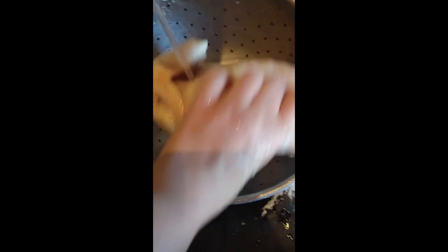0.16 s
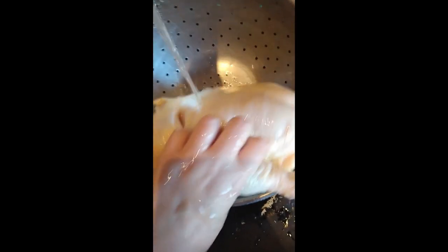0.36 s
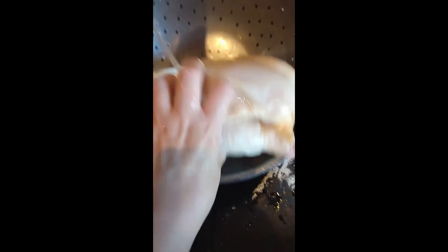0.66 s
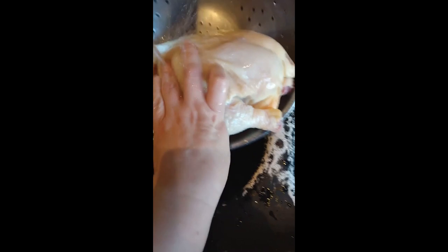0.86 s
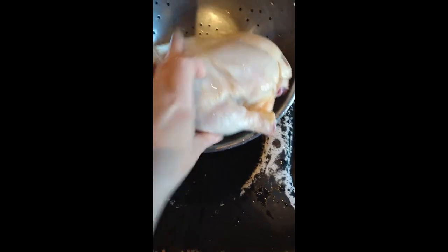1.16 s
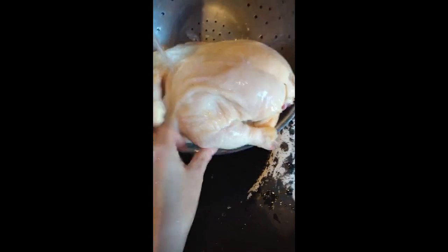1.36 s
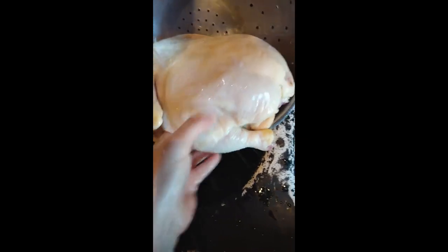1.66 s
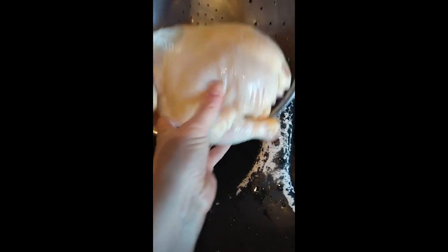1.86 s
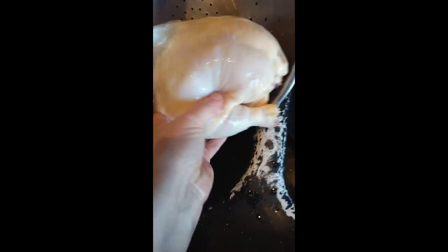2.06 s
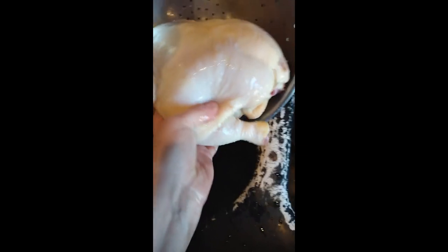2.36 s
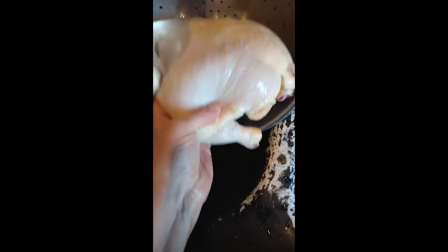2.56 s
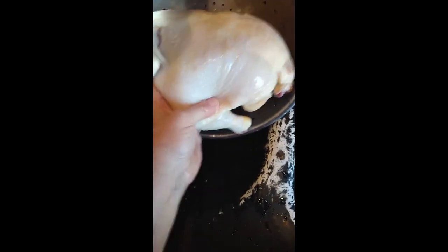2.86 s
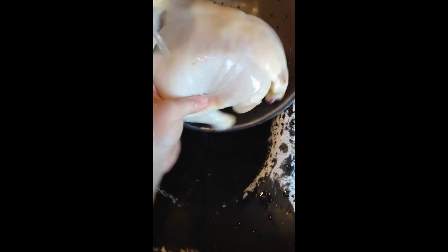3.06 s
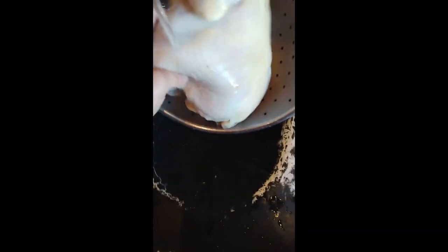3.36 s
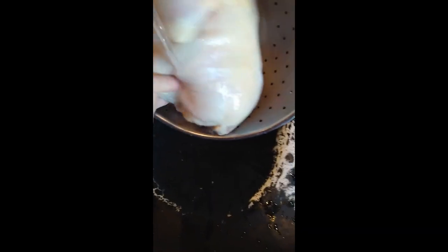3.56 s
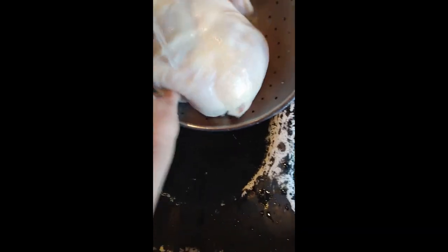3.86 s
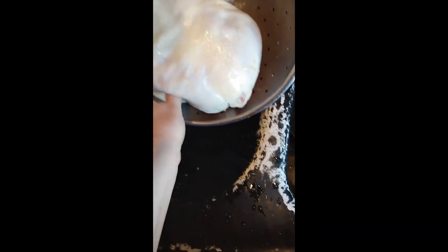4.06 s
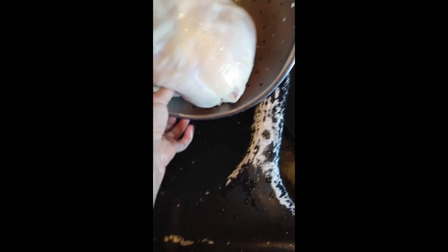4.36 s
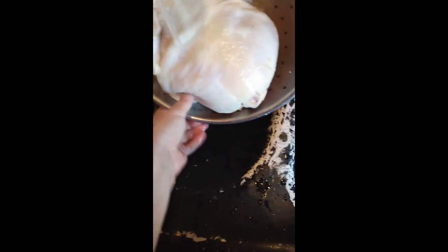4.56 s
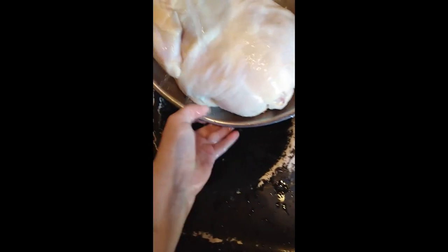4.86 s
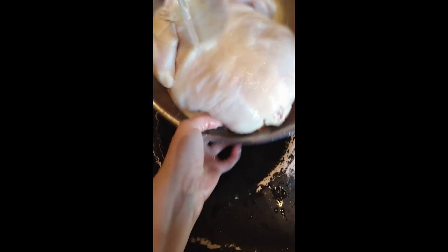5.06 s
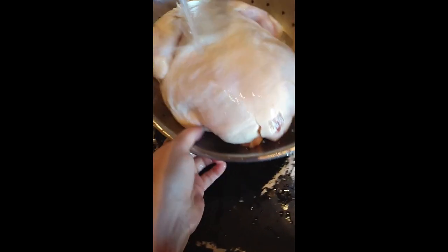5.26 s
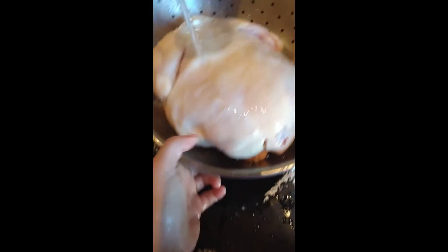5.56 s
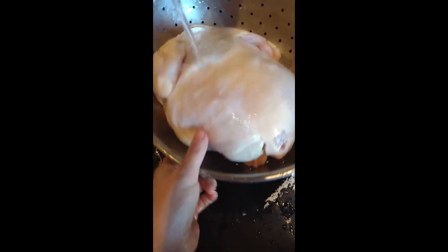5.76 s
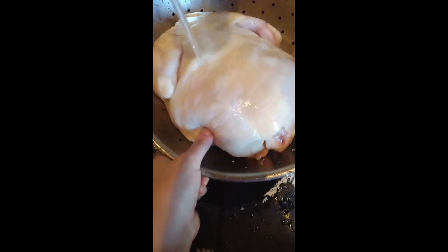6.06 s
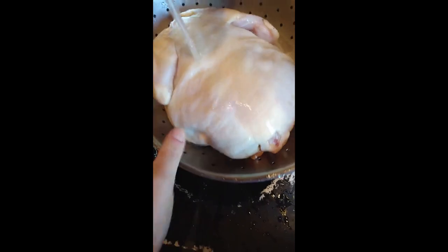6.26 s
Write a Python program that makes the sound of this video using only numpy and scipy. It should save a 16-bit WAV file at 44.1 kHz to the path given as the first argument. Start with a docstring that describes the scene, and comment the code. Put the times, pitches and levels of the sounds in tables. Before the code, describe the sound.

Close, left-leaning stereo sound of tap water over a raw chicken in a steel colander, lasting about 6.4 seconds. It opens with uneven fizz, wet plops and a splash around 0.1-0.5. From 1.0 to 2.7 the stream is fullest, hissing with coarse spray and low gurgle; a knock lands at 1.05, hollow wavering glugs follow at 1.2-1.8, and the loudest hard clank strikes at 1.95. A softer knock at 2.3 and rapid bright droplet ticks follow. At 2.9 a heavy wet slap thuds, then the water thins; a sharp bright splash-crack hits at 3.33. Sparse plops and drips continue, with a dull knock at 4.55. Around 5.1-5.3 water surges while the colander briefly scrapes and groans on the basin. Thin fizz and small drips remain to the end, over faint low hum, basin resonance and short room reflections.

```python
"""Running tap water is heard first: fizz, coarser spray and gurgle over a raw chicken in a steel colander.
Random grains and bubble notes make the stream; noise bursts with rising notes make plops and bright bursts.
The colander knocks and once drags on the basin, ringing banks of decaying steel modes; drops tick on bare steel.
A hollow sings to churning water, the basin floor booms, an appliance hums and a short room tail answers."""
import sys
import numpy as np
from scipy import signal
from scipy.io import wavfile
from scipy.ndimage import uniform_filter1d

SR = 44100
rng = np.random.default_rng(int(sys.argv[2]) if len(sys.argv) > 2 else 0)


def generate_wav(signal):
    """Clip the signal to [-1, 1] and save it as 16-bit WAV at the path in sys.argv[1]."""
    frames = np.transpose(np.atleast_2d(signal))
    scaled = np.clip(frames, -1, 1) * 32767
    pcm = np.round(scaled).astype(np.int16)
    wavfile.write(sys.argv[1], SR, pcm)


N = 282681


def undb(db):
    """Turn decibels into an amplitude factor."""
    return 10 ** (np.asarray(db) / 20)


def unit(x):
    """Scale a signal to an RMS of 1."""
    return x / np.sqrt(np.mean(x ** 2))


def curves(table):
    """Draw each column as a straight-line curve over the times in the first."""
    s, *columns = np.transpose(table)
    return [np.interp(np.arange(N) / SR, s, column) for column in columns]


def during(table):
    """Gate that is open between a table's first and last times."""
    t = np.arange(N) / SR
    return (t > table[0][0]) * (t < table[-1][0])


def band(x, hz, octaves):
    """Keep a band of the given width round a centre."""
    edges = np.clip(hz * 2. ** (np.array([-.5, .5]) * octaves), 20, .47 * SR)
    return signal.sosfilt(signal.butter(3, edges, "bandpass", fs=SR, output="sos"), x)


def fall_60db(t, t60_s):
    """Exponential decay that loses 60 dB in t60_s."""
    return np.exp(-np.log(1000) * t / t60_s)


def fade(x, t60_s):
    """Every impulse becomes an exponential decay."""
    return signal.lfilter([1], [1, -fall_60db(1 / SR, t60_s)], x)


def walk(rate_hz):
    """Random levels held 1 / rate_hz seconds and slewed; spread near 1."""
    hold = int(SR / rate_hz)
    levels = np.repeat(rng.standard_normal(N // hold + 1), hold)
    return 1.45 * uniform_filter1d(levels, hold)[:N]


def wavering_tone(hz, depth, rate_hz):
    """Sine whose pitch wanders by a fraction of itself."""
    return np.sin(2 * np.pi * np.cumsum(hz * (1 + depth * walk(rate_hz))) / SR)


def noise(n, alike):
    """Left and right noise with a given likeness."""
    a, b = rng.standard_normal((2, n))
    alike = np.clip(alike, 0, 1)
    return np.array([a, alike * a + np.sqrt(1 - alike ** 2) * b])


def sides(pan_db):
    """Left and right gains; pan_db is left minus right."""
    return undb(np.multiply.outer([.5, -.5], pan_db))


BAND_DRIFT_DB = 4  # slow random level changes in each noise band, before each layer's share


def grains(centres_hz, weights_db, per_s, scatter_db, t60_s, spread_octaves, bed, flicker_db, alike, drift):
    """Random bursts, each bright round its own centre, over a flickering bed of steady noise."""
    when, size, pick = rng.random((int(per_s * N / SR), 3)).T
    centre = np.log2(centres_hz[0]) + pick * np.log2(centres_hz[-1] / centres_hz[0])
    size = undb(scatter_db * np.minimum(-np.log(1 - size), 3.5))
    out = 0
    for hz, db in zip(centres_hz, weights_db):
        nearness = np.exp(-((np.log2(hz) - centre) / spread_octaves) ** 2)
        hits = np.bincount((when * N).astype(int), size * nearness, N)
        flicker = undb(flicker_db * walk(16) + BAND_DRIFT_DB * drift * walk(6))
        shape = (unit(fade(hits, t60_s)) + bed) * flicker
        out = out + undb(db) * unit(band(shape * noise(N, alike), hz, 0.38))
    return unit(out)


def bubbles(per_s, low_hz, high_hz, cycles, scatter_db):
    """Small trapped bubbles: each a brief rising note, placed at random between the ports."""
    out = np.zeros((2, N + SR))
    for when, pick, size, place in rng.random((int(per_s * N / SR), 4)):
        hz = low_hz * (high_hz / low_hz) ** pick
        turn = np.arange(int(3 * cycles * SR / hz)) * hz / SR
        age = turn / cycles
        note = np.sin(2 * np.pi * turn * (1 + 0.024 * age)) * age * np.exp(-2.5 * age)
        i = int(when * N)
        pan = sides(10 * (place - .5))[:, None]
        out[:, i:i + len(turn)] += undb(scatter_db * (size - 1)) * pan * note
    return unit(out[:, :N])


LUMP_SAMPLES = 130  # spacing of the random points that roughen a burst


def bursts(rows, octaves, alike, tail_db, tail_t60_s, rise_s, tone_db=-60, lumpy_db=0):
    """Lumpy noise that dies fast, a weaker spatter behind, and a note at its centre.
    Rows: start_s, level_db, centre_hz, t60_s (held to .002-.4), pan_db."""
    out, t = np.zeros((2, N + SR)), np.arange(SR // 5) / SR
    swell = (1 - np.exp(-t / rise_s)) ** 2
    spatter = undb(tail_db) * fall_60db(t, tail_t60_s)
    for s, db, hz, t60_s, pan_db in rows:
        knots = t[::LUMP_SAMPLES]
        lumps = np.interp(t, knots, rng.standard_normal(len(knots)))
        fall = swell * fall_60db(t, np.clip(t60_s, .002, .4)) * undb(lumpy_db * lumps)
        burst = band(noise(len(t), alike) * (fall + spatter), hz, octaves)
        # a bubble's note wavers and rises a little as it nears the surface
        pitch_hz = hz * (1 + 2.1 * t + .012 * lumpy_db * lumps)
        note = np.sin(2 * np.pi * np.cumsum(pitch_hz) / SR) * fall / fall.max()
        burst = burst / np.abs(burst).max() + undb(tone_db) * note
        i = int(s * SR)
        out[:, i:i + len(t)] += undb(db) * sides(pan_db)[:, None] * burst
    return out[:, :N]


def ring(force, hz, t60_s):
    """One steel mode: a decaying sine set off by a force."""
    pole = np.exp(2j * np.pi * hz / SR) * fall_60db(1 / SR, t60_s)
    return signal.lfilter([1], [1, -pole], force).imag


# running water, before the layer gains: time_s, fizz_db, spray_db, gurgle_db,
# pan_db (left minus right, for the fizz; the spray takes a share)
WATER_FLOW = [(0.0, -51.5, -49.5, -62, 6), (0.28, -52, -61, -73.5, 24), (0.45, -47.5, -67, -73.5, 22),
              (0.69, -51.5, -58, -66.5, 37), (0.8, -49, -55.5, -59.5, 12), (0.98, -42.5, -45.5, -63.5, 6.0),
              (1.32, -42.5, -45.5, -61, 0), (1.64, -45.5, -52, -71, 7), (1.98, -42, -47, -55.5, 4),
              (2.26, -45, -46, -57.5, 9), (2.34, -43.5, -47, -54, 17), (2.61, -44.5, -47, -68, 20),
              (2.93, -49, -59.5, -68, 17), (3.11, -49.5, -65, -69.5, 27), (3.39, -49.5, -62, -58, 5),
              (3.53, -47.5, -57, -69, 14), (3.77, -47.5, -59, -72.5, 1.5), (4.05, -53, -60.5, -55, 23),
              (4.3, -48, -57, -88, 12), (4.55, -50, -50, -57, 13), (4.66, -55, -56, -61, 24),
              (4.78, -52.5, -56, -76, 14), (5.0, -49.5, -62, -76.5, 15), (5.23, -45.5, -45, -58.5, 6),
              (5.4, -47.5, -61, -72.5, 15), (5.52, -49.5, -62.5, -69.5, 27), (5.64, -50, -71.5, -68, 18),
              (5.73, -52.5, -76.5, -78, 23), (5.79, -53, -80, -80.5, 20.5), (5.83, -45.5, -61.5, -68.5, 6),
              (5.95, -49.5, -60, -81, 26), (6.13, -51, -72, -74, 24.5), (6.18, -48.5, -64.5, -79.5, 22),
              (6.25, -51.5, -64, -86, 24), (6.41, -53, -72, -72.5, 23)]
# colour of the fizz, tilted by band width as it is played: pitch_hz, level_db
FIZZ_COLOUR = [(2940, -36), (5000, -5.5), (7020, -0.5), (10900, 5.5), (13900, -4.5), (15900, -4),
               (16500, -36.5)]
FIZZ_GAIN_DB, SPRAY_GAIN_DB, GURGLE_GAIN_DB = 4.5, 3.5, 3.5
DRUM_DB, DRUM_PER_GURGLE = -58.5, 0.39  # drumming grows with the gurgle


def water():
    """Fizz of tiny droplets, coarser spray, gurgle and drumming, all from the one stream."""
    fizz_db, spray_db, gurgle_db, pan_db = curves(WATER_FLOW)
    across = sides(pan_db) / np.sqrt(np.sum(sides(pan_db) ** 2, axis=0))
    drum_db = DRUM_DB + DRUM_PER_GURGLE * (gurgle_db - np.mean(gurgle_db))
    hz = 5600 * 2 ** (np.arange(5) * 0.3766)
    colour_hz, colour_db = np.transpose(FIZZ_COLOUR)
    tilt_db = np.interp(np.log(hz), np.log(colour_hz), colour_db) + 10 * np.log10(hz)
    fizz = grains(hz, tilt_db, 500., 5.1, 0.016, 0.44, bed=1.0, flicker_db=1.6, alike=0.14, drift=0.27)
    spray = grains([2000, 2600, 3400, 4300, 5400], [-10, -8, -8, -1.2, -.2],
                   300., 3.5, .013, .4, bed=.65, flicker_db=1.5, alike=.3, drift=.35)
    spray = undb(-3.5) * spray + undb(-17) * bubbles(100.0, 2028, 5720, 11.0, 4.2)
    gurgle = grains([400, 540, 720, 980, 1350, 1850], [-3, -2.5, -.2, -3, -5, -5],
                    140., 2.5, .03, .5, bed=.4, flicker_db=2.5, alike=.8, drift=.5)
    gurgle = undb(-1.5) * gurgle + undb(-8.0) * bubbles(90.0, 491, 1840, 4.4, 7.8)
    rumble = unit(band(noise(N, 0.91), 189.0, 1.95)) * undb(drum_db - 2.0)
    return (undb(fizz_db + FIZZ_GAIN_DB) * across * fizz
            + undb(spray_db + SPRAY_GAIN_DB) * sides(0.17 * pan_db) * spray
            + undb(gurgle_db + GURGLE_GAIN_DB) * gurgle
            + rumble + basin_drumming(drum_db))


# modes of the steel basin: pitch_hz, level_db, t60_s, pan_db (left minus right)
BASIN_MODES = [(101.6, -4, .3, 3), (129, -12.5, .15, 7.5), (158.5, -10, 0.41, -0.5),
               (206, -10.5, 0.23, 1.8), (236.5, -4.5, 0.36, 1.3), (267.5, -5.5, .15, -4),
               (326.6, -11.5, 0.24, -1), (381.8, -11.5, .2, -3), (460, -27, 0.18, 5),
               (631, -15.5, 0.14, -2), (745, -15.5, 0.036, 5.5), (880, -13.5, 0.091, 4),
               (925, -13.5, 0.034, -7), (1184, -15.5, 0.16, -3.5), (1384, -6, 0.082, 6.5)]
DEEP_BELOW_HZ = 215  # the basin's deep modes lie below this


def ring_basin(force_on):
    """Shake every basin mode with the force that force_on gives for its pitch."""
    out = np.zeros((2, N))
    for hz, db, t60_s, pan_db in BASIN_MODES:
        out += undb(db) * sides(pan_db)[:, None] * ring(force_on(hz), hz, t60_s)
    return out


def basin_drumming(drum_db):
    """Falling water patters on the basin as random force, weaker on the high modes."""
    patter = rng.standard_normal(N) * undb(drum_db + 1.2 * walk(4.5))
    return ring_basin(lambda hz: patter * undb(-29.0) / (1 + (hz / 500) ** 2))


# appliance hum, before its slow level drift: pitch_hz, level_db
HUM_TONES = [(100, -61), (300, -83)]


def hum():
    """An appliance hums: low tones waver in pitch and level, stronger on the left."""
    tones = sum(undb(db + 1.9 * walk(8.1)) * wavering_tone(hz, 0.0302, 16) for hz, db in HUM_TONES)
    return sides(2.2)[:, None] * tones


# water slaps and plops on the bird: start_s, level_db, pitch_hz, t60_s, smack_db (over level_db)
BIRD_PLOPS = [(0.046, -48, 466, 0.03, 1), (0.094, -41.5, 466, 0.33, -1.5), (0.122, -35.5, 2700, 0.017, -26),
              (0.138, -45.5, 488, 0.11, -0.5), (0.246, -37, 750, 0.016, -25), (0.321, -38, 540, 0.016, -39),
              (0.452, -33.5, 2060, 0.015, -8.5), (0.656, -35, 790, 0.0096, -32),
              (0.879, -45, 752, 0.11, -26), (1.199, -42, 1133, 0.045, -13), (1.328, -43, 2980, 0.038, -28),
              (1.425, -35.5, 2950, 0.04, -7), (1.627, -38.5, 3040, 0.023, -20),
              (1.73, -39.5, 934, 0.056, -21), (1.89, -44.5, 1138, 0.075, -17), (2.882, -38, 620, 0.038, 5),
              (2.8945, -26, 560, 0.045, 0), (2.911, -32, 1410, 0.025, 2), (2.925, -54, 694, 0.046, -7),
              (2.902, -25, 982, 0.021, -12), (3.075, -44, 1356, 0.068, -1), (3.329, -32.5, 684, 0.028, -12),
              (3.5315, -37, 750, 0.042, -13), (3.538, -38.5, 460, 0.015, -18),
              (3.586, -40, 2280, 0.023, -25), (3.794, -47.5, 750, 0.16, -21), (3.838, -45.5, 794, .03, 2),
              (3.85, -42, 700, 0.038, 6), (3.965, -35, 912, 0.071, -3.5), (4.023, -46, 830, 0.021, 0),
              (4.118, -44.5, 2480, 0.051, 7), (4.179, -38.5, 1850, 0.067, 5), (4.465, -41, 660, 0.023, -22),
              (4.76, -51, 2080, 0.081, -5), (5.072, -37, 2370, 0.033, 5), (5.223, -31.5, 2950, 0.057, 2),
              (5.432, -50.5, 673, 0.064, -28), (5.568, -57.5, 736, 0.059, -1),
              (5.628, -54.5, 745, 0.11, -16), (5.9, -44, 2770, 0.046, -18.5), (6.03, -53, 2176, 0.066, -24),
              (6.204, -54, 1198, 0.095, -29), (6.316, -55.5, 3200, 0.12, -20),
              (6.319, -59, 490, 0.072, -24), (6.384, -55.5, 623, 0.1, -29)]
PLOP_PAN_DB = 1


def plops():
    """Each plop sounds a bubble note with a wider smack of noise."""
    notes = [(s, db, hz, t60_s, PLOP_PAN_DB) for s, db, hz, t60_s, _ in BIRD_PLOPS]
    smacks = [(s, db + smack_db, 1250, t60_s, PLOP_PAN_DB) for s, db, _, t60_s, smack_db in BIRD_PLOPS]
    return (bursts(notes, 0.96, 0.48, -22.5, 0.084, 0.0033, tone_db=0.0, lumpy_db=3.0)
            + bursts(smacks, 1.6, 0.37, -36.5, 0.138, 0.0076, lumpy_db=2.5))


# modes of the colander: pitch_hz, level_db, t60_s
COLANDER_MODES = [(1325, -2, .04), (1610, -3, 0.04), (1730, -6, .04), (1975, -4, .03), (2386, -4, .02),
                  (2558, 2, .016), (2795, -5, 0.022), (3321, -7, 0.03), (3600, -7, 0.03), (3890, -8, .03),
                  (4145, -1, 0.045), (5340, -2, .04), (5570, -7, .04), (6960, -3, .025)]


def ring_colander(force_on):
    """Shake every colander mode with the force that force_on gives for its pitch."""
    return sum(undb(db) * ring(force_on(hz), hz, t60_s) for hz, db, t60_s in COLANDER_MODES)


# the colander knocks the basin: start_s, level_db, crack_db, ring_db, deep_db (weight on deep modes),
# crack_hz, contact_ms, clatter_db; levels after the first are relative to it
COLANDER_KNOCKS = [(0.092, -38, -4.5, -13.5, 13, 2320, 1.2, -13),
                   (1.0536, -20, -7, -7, -7, 1850, 1.46, -12.5),
                   (1.203, -34.5, 3, -11, -15, 2030, 1.1, -1.5),
                   (1.9493, -7.5, 1, -7, -2.5, 2430, 1.5, -11),
                   (2.284, -21.5, -8, -2.5, -13, 1630, 2.36, -29),
                   (2.892, -30, -6, -6, -11, 2420, 0.65, -3), (3.257, -40, -13, -3, -9, 2000, 1.6, -10),
                   (3.331, -35.5, 23, -10, -2, 4570, 0.45, 3), (3.417, -36, -9, -5, -24, 1500, 2.7, -21),
                   (4.549, -25, 0.5, -16.5, 5.5, 2310, 1, -30), (5.349, -42, -6, -4, -16, 1500, 0.96, -22)]
KNOCK_PAN_DB = -0.5
CLINK_DB, CLINK_OCTAVES = -9.5, 0.94
CLATTER_T60_S, CLATTER_OCTAVES = 0.33, 3.5


def crack_nearness(hz):
    """How strongly each knock's crack reaches a colander mode."""
    crack_hz = np.transpose(COLANDER_KNOCKS)[5]
    return np.exp(-(np.log2(hz / crack_hz) / CLINK_OCTAVES) ** 2)


def knocks():
    """Each contact pushes, cracks and clatters, and rings basin and colander modes."""
    s, knock_db, crack_db, ring_db, deep_db, crack_hz, contact_ms, clatter_db = np.transpose(COLANDER_KNOCKS)
    at, push = (s * SR).astype(int), np.zeros(N)

    def basin_blows(hz):
        """Each blow lands on another spot; its own weight sets how it reaches the deep modes."""
        blows = np.zeros(N)
        spot_db = -2.5 + 1.2 * rng.standard_normal(len(s)) + (hz < DEEP_BELOW_HZ) * deep_db
        blows[at] = undb(knock_db + ring_db + spot_db)
        return blows

    def colander_blows(hz):
        """Each port hears another mix of the modes."""
        blows = np.zeros((2, N))
        mix = 1 + 0.91 * rng.standard_normal((2, len(s)))
        blows[:, at] = undb(knock_db + crack_db + CLINK_DB) * crack_nearness(hz) * mix
        return blows

    # a soft contact is a longer push
    for i, db, ms in zip(at, knock_db, contact_ms):
        shape = np.hanning(int(ms * SR / 1000) + 3)
        push[i:i + len(shape)] = undb(db + 31.5) * shape / shape.sum()

    def contact(level_db, hz, t60_s, *settings):
        """One noise burst for every knock."""
        rows = [(start, db, f, t60_s, KNOCK_PAN_DB) for start, db, f in zip(s, level_db, hz)]
        return bursts(rows, *settings)

    cracks = contact(knock_db + crack_db, crack_hz, .011, 0.75, 0.4, -34, 0.15, 0.00027)
    clatter = contact(knock_db + clatter_db, .6 * crack_hz, CLATTER_T60_S,
                      CLATTER_OCTAVES, 0.05, -34.5, .5, 0.0017)
    # wet meat and loose steel blur the ring into a rough thud
    thuds = contact(knock_db - 11, np.full(len(s), 270), .19, 0.96, 1.0, -35.5, 0.29, 0.0021)
    ringing = ring_basin(basin_blows) + ring_colander(colander_blows)
    return ringing + band(push, 300, 2.48) + cracks + clatter + thuds


# soft booms of the basin floor: start_s, level_db, pitch_hz
FLOOR_BOOMS = [(0.116, -53, 156), (0.9, -45, 244.5), (1.2, -40.5, 203), (1.473, -53.5, 189),
               (2.311, -53, 244), (3.269, -51, 250.5), (4.951, -52, 224), (5.275, -44, 240.4),
               (5.973, -59, 231)]
BOOM_T60_S = 0.2


def booms():
    """The basin floor flexes: a low note under a narrow burst of noise."""
    rows = [row + (BOOM_T60_S, KNOCK_PAN_DB) for row in FLOOR_BOOMS]
    return bursts(rows, 0.31, 0.87, -40, .3, 0.01, tone_db=2.0)


# bright bursts: droplets, a few water surges, and the treble of some knocks and the drag:
# start_s, level_db, centre_hz, t60_s
BRIGHT_BURSTS = [(0.1315, -25.5, 6070, 0.056), (0.37, -29, 3790, 0.079), (0.456, -28.5, 4350, 0.0049),
                 (0.53, -34, 8900, 0.0065), (0.658, -55, 9500, 0.009), (0.7833, -33, 6040, 0.57),
                 (0.987, -35, 4800, 0.026), (1.071, -24, 7650, 0.0036), (1.19, -29, 11400, 0.013),
                 (1.399, -28, 4550, 0.054), (1.429, -31, 4300, 0.022), (1.5263, -28.5, 4600, 0.0078),
                 (1.558, -32, 4090, 0.013), (1.582, -28, 10350, 0.02), (1.707, -31.5, 6370, 0.015),
                 (1.891, -29.5, 3480, 0.023), (1.914, -35, 10200, 0.011), (1.9491, -18.5, 4020, 0.017),
                 (1.948, -18.5, 9420, 0.019), (2.078, -27, 8700, 0.0083), (2.098, -31, 7900, 0.0084),
                 (2.1494, -33, 12800, 0.011), (2.255, -27, 12000, 0.0083), (2.292, -32, 9800, 0.013),
                 (2.304, -36, 11500, 0.019), (2.382, -27, 9230, 0.01), (2.4144, -29, 9970, 0.013),
                 (2.4227, -27.5, 5730, 0.0087), (2.441, -28, 11400, 0.012), (2.46, -30, 9800, 0.006),
                 (2.4795, -36, 7500, 0.012), (2.508, -32, 10060, 0.013), (2.5475, -24.5, 11200, 0.013),
                 (2.575, -28, 12800, 0.013), (2.676, -29, 14100, 0.012), (2.692, -24, 11200, 0.013),
                 (2.756, -41, 7900, 0.014), (2.822, -24.5, 5490, 0.011), (2.8934, -29, 4660, 0.007),
                 (2.9793, -38, 9900, 0.011), (3.163, -38, 10500, 0.015), (3.3283, -14.5, 6050, 0.051),
                 (3.5707, -30, 10500, 0.013), (3.585, -32, 5500, 0.016), (3.626, -27, 11500, 0.0084),
                 (3.638, -23, 6800, 0.016), (3.741, -31.5, 12000, 0.013), (4.2683, -33, 5400, 0.023),
                 (4.333, -34, 6700, 0.015), (4.403, -30, 10200, 0.0073), (4.427, -43, 13600, 0.008),
                 (4.496, -35.5, 6230, 0.01), (4.53, -39, 8400, 0.007), (4.564, -32.5, 7900, 0.009),
                 (4.713, -34, 7900, 0.013), (4.769, -31.5, 6140, 0.0061), (4.815, -34, 12700, 0.01),
                 (5.073, -28.5, 5960, 0.049), (5.105, -29, 6360, 0.0058), (5.222, -28, 5300, 0.062),
                 (5.302, -33, 10130, 0.0061), (5.5, -39, 5300, .02), (5.515, -36, 5030, .02),
                 (5.547, -34.5, 5680, 0.0085), (5.7142, -32, 14500, 0.022), (5.8916, -38, 9300, 0.014),
                 (5.9675, -26, 14500, 0.017), (6.2678, -35.5, 7710, 0.018)]
# smaller droplets fall by chance, their level tied to the fizz of the moment
STRAY_OVER_FIZZ_DB, STRAY_SCATTER_DB, STRAY_T60_S = 13.5, 9, 0.0084
STRAY_LOW_HZ, STRAY_HIGH_HZ = 4520, 13500
BRIGHT_PAN_DB_OCT, BRIGHT_CENTRE_HZ = 3, 2650  # the higher the burst, the further left it is heard


def bright_bursts(count=40):
    """Bright bursts, mostly short: droplets, a few surges, and the treble of some knocks and the drag."""
    fizz_db = curves(WATER_FLOW)[0]
    strays = []
    for when, size, pick in rng.random((count, 3)):
        level_db = fizz_db[int(when * N)] + STRAY_OVER_FIZZ_DB - STRAY_SCATTER_DB * size
        hz = STRAY_LOW_HZ * (STRAY_HIGH_HZ / STRAY_LOW_HZ) ** pick
        strays.append((when * N / SR, level_db, hz, STRAY_T60_S))
    rows = [row + (BRIGHT_PAN_DB_OCT * np.log2(row[2] / BRIGHT_CENTRE_HZ),) for row in BRIGHT_BURSTS + strays]
    return bursts(rows, 0.75, 0.1, -30.0, 0.12, 0.003, tone_db=-9, lumpy_db=2.5)


# drops on bare steel, before the shared delay and gain:
# start_s, level_db, centre_hz, pan_db (left minus right)
STEEL_TICKS = [(0.133, -35, 6580, 7.5), (0.3767, -20, 9500, 10.5), (0.5292, -31, 8950, 11.0),
               (0.6581, -30.5, 9400, 24), (0.9507, -35, 10300, 7.5), (0.988, -18, 10300, 4.5),
               (1.1902, -20, 11400, 4.0), (1.525, -44, 5320, 3.0), (1.5818, -21, 10700, 9),
               (1.916, -16, 10300, 5.0), (2.0803, -25, 8700, 6.0), (2.2568, -24, 12900, 9.0),
               (2.3056, -13.5, 11200, 9), (2.351, -30, 6050, 12.5), (2.4162, -16, 9990, 15),
               (2.4235, -32, 5330, 8.0), (2.442, -22, 11200, 11.0), (2.4464, -25, 12400, 8.5),
               (2.463, -26, 9770, 11.0), (2.4804, -23, 9520, 9.0), (2.5113, -33, 9860, 10),
               (2.5371, -29, 8060, 13.0), (2.5492, -20, 10600, 11.5), (2.575, -29, 12900, 12.0),
               (2.6044, -30, 10600, 9), (2.6771, -15, 13800, 17), (2.6938, -25, 11100, 14),
               (2.7587, -28, 8150, 8), (2.8228, -31, 5300, 9), (2.939, -34.5, 5260, 16),
               (2.9786, -27, 9870, 13.0), (3.0026, -33, 11200, 17), (3.0205, -29, 7200, 14),
               (3.0589, -35, 5760, 22), (3.1425, -38, 7990, 17.0), (3.1637, -26, 10400, 16),
               (3.5733, -25, 9250, 11.0), (3.6257, -13.5, 11300, 8), (3.6387, -26, 6050, 2),
               (4.3784, -38, 7840, 6.0), (4.405, -25, 10500, 3), (4.816, -29, 12700, -1),
               (5.657, -31, 9200, 15), (5.9686, -20, 13200, 12.5)]
TICK_T60_S, TICK_GAIN_DB, TICK_DELAY_S = .003, -1, .0006


def ticks():
    """Drops strike bare steel: needle-sharp bursts that drop 60 dB in milliseconds to a faint spatter."""
    rows = [(s + TICK_DELAY_S, db + TICK_GAIN_DB, hz, TICK_T60_S, pan_db) for s, db, hz, pan_db in STEEL_TICKS]
    return bursts(rows, 1.09, 0.5, -25, 0.012, 0.000068)


# glugs in the hollow: peak_s, level_db
HOLLOW_GLUGS = [(1.21, -37), (1.237, -37), (1.3, -45), (1.36, -45), (1.432, -54), (1.481, -48),
                (1.57, -53.5), (1.625, -51), (1.709, -43), (1.755, -42.5), (1.795, -57.5)]
# spells of quiet murmur: start_s, end_s, level_db (over MURMUR_DB)
MURMUR_SPELLS = [(1.1, 2.51, 1), (5.41, 5.72, -2.5), (5.973, 6.41, -9)]
MURMUR_DB, HOLLOW_HZ = -65, 746
SURGE_RISE_DB_S, SURGE_FALL_DB_S = 1088, 848


def hollow():
    """Water churns in a hollow that sings one wavering note, in murmurs and glugs."""
    t = np.arange(N) / SR
    size = sum(undb(MURMUR_DB + db) * (t > start) * (t < end) for start, end, db in MURMUR_SPELLS)
    for s, db in HOLLOW_GLUGS:
        size = size + undb(db - np.maximum(SURGE_RISE_DB_S * (s - t), SURGE_FALL_DB_S * (t - s)))
    churn = unit(band(rng.standard_normal(N), 33, 2.0)) + 2.1
    return size * unit(churn) * wavering_tone(HOLLOW_HZ, 0.049, 40)


# the colander drags over the basin: time_s, weight_db (on the basin), rasp_db
COLANDER_DRAG = [(5.04, -68, -83), (5.076, -55, -45.5), (5.122, -44, -42.5), (5.136, -31.5, -37),
                 (5.204, -34, -46), (5.234, -49, -33), (5.27, -41.5, -52), (5.3, -61, -55),
                 (5.34, -62, -53), (5.42, -69, -63)]
GROAN_DB = -8.5  # relative to the weight


def drag():
    """Random slips of steel on steel rasp and groan, and shake both sets of modes."""
    weight_db, rasp_db = curves(COLANDER_DRAG)
    gate = during(COLANDER_DRAG)
    weight = gate * undb(weight_db)
    slips = unit(rng.standard_normal(N) * (rng.random(N) < 2600 / SR))  # about 2600 a second
    basin = ring_basin(lambda hz: slips * weight * undb(-28.5 - 7.9 * (hz < DEEP_BELOW_HZ)))
    colander = ring_colander(lambda hz: crack_nearness(hz).mean() * slips * gate * undb(rasp_db - 22.5))
    grit = slips * noise(N, 0.24)
    rasp = gate * undb(rasp_db - 0.5) * unit(band(grit, 1670, 1.0))
    groan = weight * undb(GROAN_DB) * unit(band(grit, 630, 1.27))
    low_scrape = weight * undb(-1.5) * unit(band(slips, 265, 1.0))
    return basin + colander + rasp + groan + low_scrape


ROOM_T60_S, ROOM_DB = 0.3, -12


def room(near):
    """Basin walls and kitchen tiles answer with a short diffuse tail."""
    t = np.arange(SR // 2) / SR
    tail = rng.standard_normal((2, len(t))) * fall_60db(t, ROOM_T60_S) * np.minimum(t / 0.0078, 1)
    tail = signal.lfilter([1], [1, -.4], tail)  # darkens the tail
    tail /= np.sqrt((tail ** 2).sum(axis=1, keepdims=True))
    return undb(ROOM_DB) * signal.fftconvolve(band(near, 2700, 5.4), tail, axes=1)[:, :N]


LEFT_LEAD_S = .0003  # the sink is nearer the left port


def ports(x):
    """The right port hears everything a little later."""
    lag = int(LEFT_LEAD_S * SR)
    return np.array([x[0], np.concatenate([np.zeros(lag), x[1, :N - lag]])])


def scene():
    """Mix the sounds at the sink, then add the room tail and the hum."""
    near = water() + plops() + knocks() + booms() + bright_bursts() + ticks() + hollow() + drag()
    return ports(near) + room(near) + hum()


TOP_HZ = 15900


def record(dry):
    """The microphone drops the deep bass and adds its own rumble; the phone cuts the top."""
    mic = signal.sosfilt(signal.butter(6, 90, "highpass", fs=SR, output="sos"), dry)
    mic = mic + undb(-69.5) * unit(band(noise(N, 0.21), 55, 0.38))
    mic = mic + undb(-81.5) * unit(band(noise(N, .3), 30, 1.6))
    return signal.sosfilt(signal.ellip(10, .2, 80, TOP_HZ, fs=SR, output="sos"), mic)


dry = scene()
out = record(dry)
generate_wav(out)
```